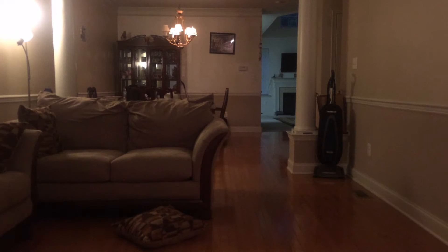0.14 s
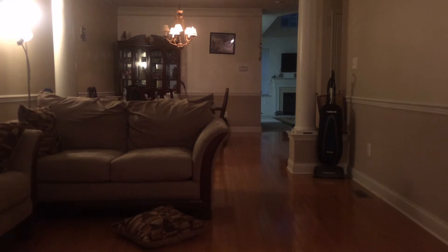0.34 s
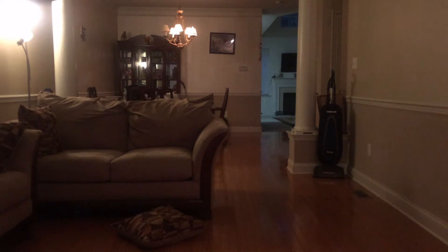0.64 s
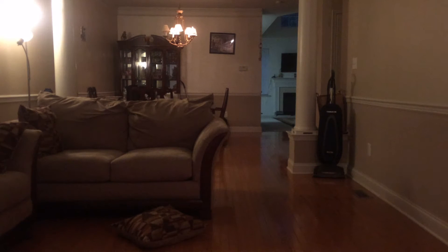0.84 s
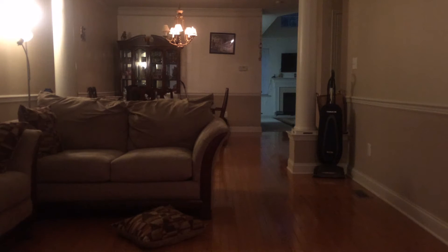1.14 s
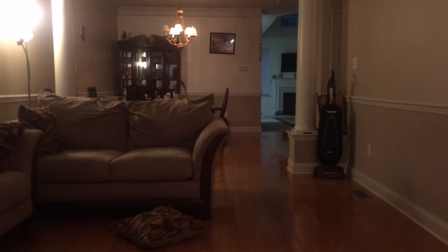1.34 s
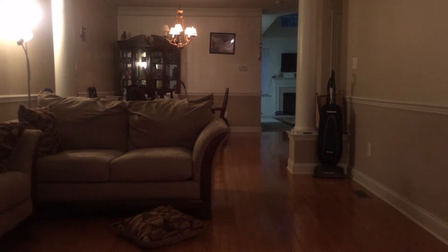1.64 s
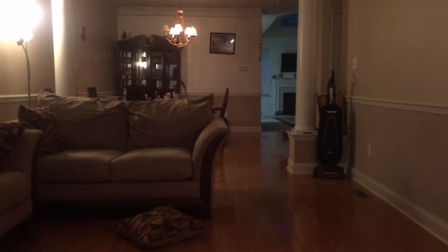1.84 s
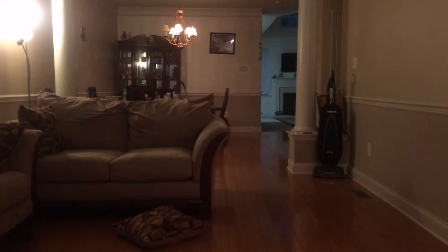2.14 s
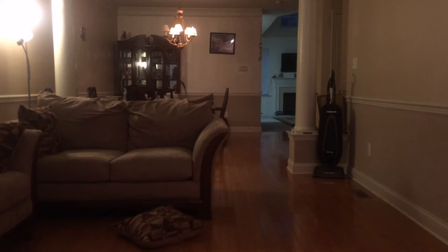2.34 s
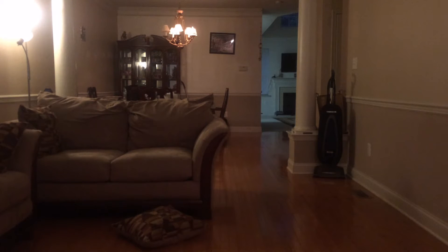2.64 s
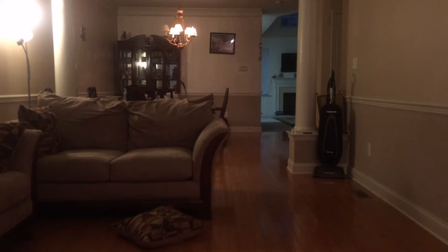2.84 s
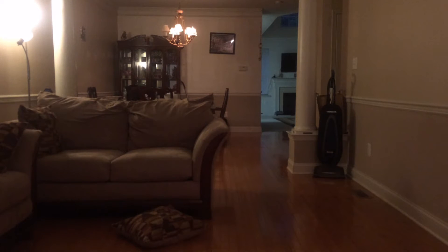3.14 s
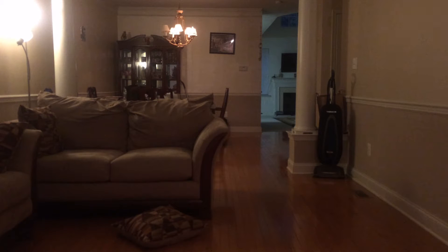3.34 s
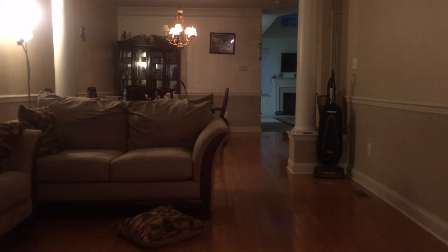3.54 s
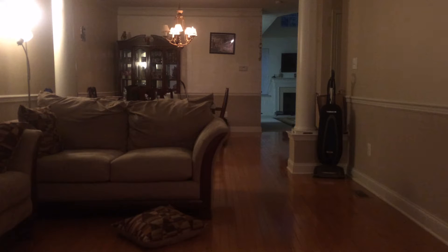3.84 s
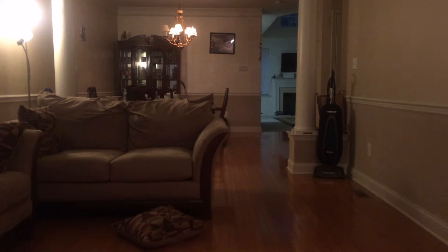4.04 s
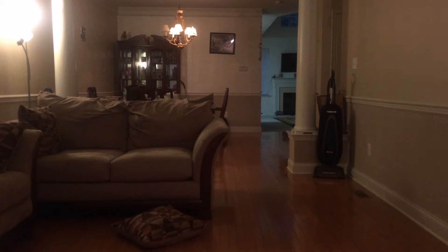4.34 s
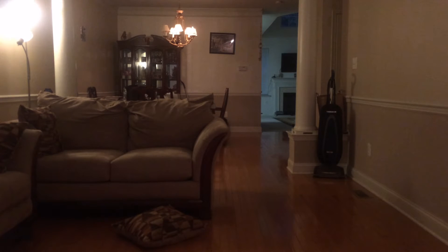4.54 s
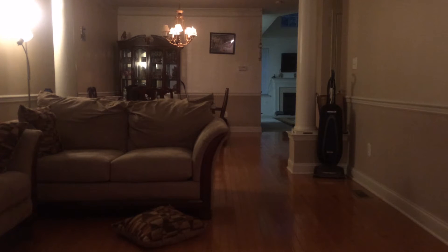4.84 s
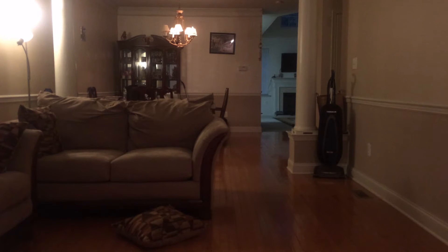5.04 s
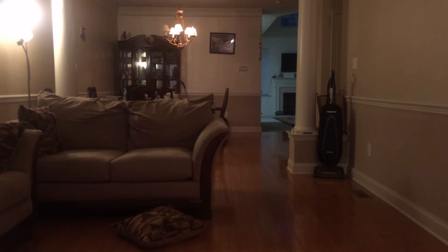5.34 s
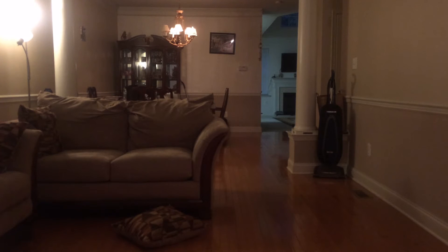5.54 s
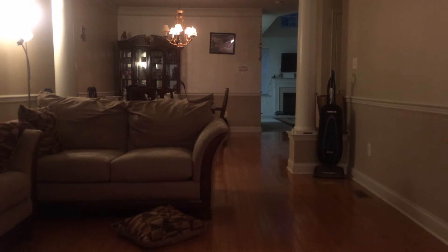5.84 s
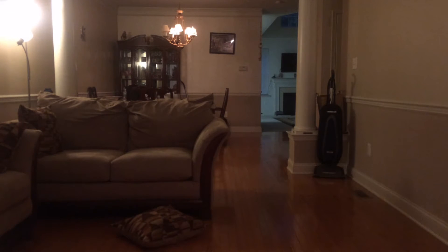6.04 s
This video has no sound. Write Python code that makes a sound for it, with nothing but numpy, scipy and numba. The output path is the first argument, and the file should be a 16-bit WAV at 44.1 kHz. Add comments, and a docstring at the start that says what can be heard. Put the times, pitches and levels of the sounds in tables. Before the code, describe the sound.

Five loud snapping shots from a toy dart blaster alternate with quick two-part plastic slide clacks, close up in a lightly echoing living room.

```python
"""A spring-powered toy dart blaster is pumped and fired repeatedly in a living room with a wooden floor.
Shots: sear snap, plunger slam and rebound, spring shudder, low air thump. Slide: stick-slip noise, bouncing clacks.
Every blow is a noise burst plus panel modes; resonators for the hollow plastic shell colour all but the thump.
Echoes and a decaying tail make the room; ventilation drones faintly; a limiter rounds the loudest peaks."""
import sys
import numpy as np
from scipy import signal
from scipy.fft import rfft, irfft
from scipy.io import wavfile
from numba import njit

SR = 44100
rng = np.random.default_rng(int(sys.argv[2]) if len(sys.argv) > 2 else 0)


def waveform_to_disk(signal):
    """Save audio, clipped to [-1, 1], as 16-bit WAV at the path in sys.argv[1]."""
    frames = np.transpose(np.atleast_2d(signal))
    scaled = np.clip(frames, -1, 1) * 32767
    samples = np.round(scaled).astype(np.int16)
    wavfile.write(sys.argv[1], SR, samples)


N = 272979

# ventilation drone spectrum, relative: hz, density_db_per_hz
HOUSE_SPECTRUM = [(22, -18.5), (54, -10.5), (105, -4), (135, -3), (167, -1.5), (205, -11), (320, -11),
                  (450, -13.5), (1700, -15), (3000, -28.5), (15000, -39.5)]
# room reverberation: hz, t60_s
ROOM_DECAY = [(80, 0.12), (210, 0.35), (560, 0.56), (1470, 0.59), (3880, 0.65), (7000, 0.53), (10200, 0.41),
              (15000, 0.34)]
# plastic shell resonances, relative to the direct blow: hz, width_hz, level_db
SHELL_MODES = [(554.3, 13, 0.5), (639, 66, -7.5), (973, 9.1, -15.5), (1168, 19, -6), (1370, 55, -18.5),
               (1570, 114.6, -7), (2050, 120, -15.5), (3024, 35, -18), (5620, 930, -18), (8890, 57, -33)]
# knocks of trigger, grip and landing darts: start_s, level_db, treble_over_body_db
SMALL_KNOCKS = [(.8455, -34.5, -13), (.907, -29, -13), (1.605, -25, -20.5), (1.650, -14.5, -1),
                (2.086, -25, -25), (2.765, -10.5, 2), (2.780, -14, -13), (3.125, -24, -12),
                (3.165, -27.5, -29), (4.1605, -14.5, -5), (4.185, -13.5, -8), (5.5805, -14, -2),
                (5.996, -27.5, -18)]
# slide pulled back: pickup_s, pickup_db, slack_s, unseat_db, squeeze_s, latch_db
SLIDE_PULLS = [(.9605, 6, 0.025, -8, .0253, 4), (2.1307, 3.5, 0.021, -8, 0.028, 4),
               (3.4888, 1, 0.018, -10, 0.045, 3), (4.7565, 5.5, 0.031, -21.5, .030, 1.5),
               (6.168, 4.5, 0.03, -15, .030, 6.5)]
# slide pushed forward: slam_s, slam_db, treble_over_body_db, stroke_s, meet_early_s, meet_db
SLIDE_PUSHES = [(1.2795, 10.5, 8.5, 0.061, 0.0095, 1.5), (2.463, 6.5, 3.5, .0795, 0.022, 1.5),
                (3.855, 9.5, 9, .0755, .0112, 5.5), (5.1574, 8, 3.5, 0.088, 0.021, 3)]
# spectrum of slide, trigger and sear sounds, relative: hz, level_db
SLIDE_SPECTRUM = [(60, -26), (170, -20.5), (380, -6.5), (560, -4), (800, -3.5), (1150, -1.5), (1600, -2.5),
                  (2200, -6), (3000, -7.5), (4000, -6), (8700, -7.5), (14500, -14), (17000, -35.5)]
# shots: release_s, snap_db, travel_s, slam_db, slam_treble_over_body_db, thump_db
SHOT_EVENTS = [(.0055, 1, 0.0085, 14, 9, 1.5), (1.6706, 7, 0.0059, 15, 5, 4),
               (2.8119, 7.5, 0.0075, 14, 0.5, 8), (4.214, 3.5, .007, 14.5, 5, 2.5),
               (5.605, 1.5, 0.0076, 15, 5, 6)]
# plunger slam spectrum, relative: hz, level_db
SLAM_SPECTRUM = [(35, -27), (90, -1), (200, -4), (300, 5), (430, -3), (620, -1.5), (950, -4), (1550, -5.5),
                 (2200, -11), (3600, -13), (6500, -14.5), (13000, -21.5), (16000, -33)]
# low ring set off by the puff of air, relative: hz, t60_s, level_db
THUMP_MODES = [(57, 0.17, -19), (103.5, 0.18, -0.5), (138, 0.044, -15), (160.2, 0.23, -2),
               (230, 0.32, -6.5), (310, 0.57, -8)]

HOUSE_DB = -56
TOP_HZ = 15300
# pull: unseat, pick up spring, latch plunger, hit back stop
UNSEAT_TREBLE_DB, PICKUP_TREBLE_DB, LATCH_TREBLE_DB = -6, 2.5, 8.5
STOP_AFTER_LATCH_S, STOP_OVER_LATCH_DB, STOP_TREBLE_DB = 0.0175, 1.73, 4
# push: leave back stop, meet breech with a flat face, slam home
LEAVE_DB, LEAVE_TREBLE_DB, MEET_DULLER_DB = -6.5, -1, 5
# bounces: mean first gap, shrink per gap, log-normal gap scatter, loss per bounce
BOUNCE_GAP_S, BOUNCE_SHRINK, BOUNCE_SCATTER = 0.009, 0.85, 0.1
BOUNCE_LOSS_DB, STOP_BOUNCE_LOSS_DB, MEET_BOUNCE_LOSS_DB = 6.5, 4, 3
# rail rubbing: start_db, end_db; grows as the spring is squeezed, eases going forward
PULL_RUB_DB, PUSH_RUB_DB = (-34, -21.5), (-27, -35.5)
RUB_LEAD_S = 0.0076  # creep before the first click


def undb(db):
    """Decibels to gain."""
    return 10 ** (np.asarray(db) / 20)


def unit(x):
    """Scale to unit energy."""
    return x / np.sqrt(np.sum(x ** 2))


def fade(t_s, t60_s):
    """Exponential decay, 60 dB down after t60_s."""
    return np.exp(-np.log(1000) * t_s / t60_s)


def add(track, start_s, sound):
    """Mix a sound into the track at start_s."""
    i = max(int(start_s * SR), 0)
    track[i:i + len(sound)] += sound[:max(N - i, 0)]


def split(x, split_hz):
    """Second-order low-pass and high-pass halves: body, treble."""
    low = signal.butter(2, split_hz, fs=SR, output="sos")
    high = signal.butter(2, split_hz, "high", fs=SR, output="sos")
    return signal.sosfilt(low, x), signal.sosfilt(high, x)


def on_log_axis(hz, points):
    """Interpolate (hz, value) points along log frequency."""
    point_hz, value = np.transpose(points)
    return np.interp(np.log(np.maximum(hz, 1)), np.log(point_hz), value)


def convolve(x, response):
    """Pass a track through an impulse response."""
    return signal.fftconvolve(x, response)[:N]


def colour(points, size=4096):
    """Minimum-phase impulse response of unit energy, by folding the cepstrum of the given spectrum."""
    gain = undb(on_log_axis(np.fft.rfftfreq(size, 1 / SR), points))
    cepstrum = irfft(np.log(gain))
    cepstrum[1:size // 2] *= 2
    cepstrum[size // 2 + 1:] = 0
    return unit(irfft(np.exp(rfft(cepstrum))))


def linger(power, t60_s):
    """Energy that is stored and leaks away, 60 dB down after t60_s."""
    keep = fade(1 / SR, t60_s) ** 2
    return signal.lfilter([1 - keep], [1, -keep], power)


def house():
    """Ventilation: steady noise shaped to a mostly low spectrum."""
    return undb(HOUSE_DB) * convolve(rng.standard_normal(N), colour(HOUSE_SPECTRUM))


def room(x, tail_db, early_db, early_t60_s=0.21, hall_db=-15, hall_stretch=2.11, first_echo_s=0.002,
         build_t60_s=0.012, modal_hz=1500, echoes_per_s=900):
    """Direct sound, sparse echoes off floor and furniture, then a tail that lingers in the adjoining hall."""
    t_s = np.arange(SR) / SR
    echoes = (rng.random(SR) < echoes_per_s / SR) * rng.standard_normal(SR) * (t_s > first_echo_s)
    response = undb(early_db) * unit(echoes * fade(t_s, early_t60_s))
    diffuse = 0
    edges_hz = np.r_[np.geomspace(70, 6000, 9), 8500, 11500, 17000]
    for low_hz, high_hz in zip(edges_hz, edges_hz[1:]):
        band = signal.butter(3, [low_hz, high_hz], "bandpass", fs=SR, output="sos")
        hz = np.sqrt(low_hz * high_hz)
        t60_s = on_log_axis(hz, ROOM_DECAY)
        # low bands mostly repeat one fixed response; high bands mostly ring as fresh noise
        modal = 1 / (1 + (hz / modal_hz) ** 2)
        decay = unit(fade(t_s, t60_s) * (1 - fade(t_s, build_t60_s)))
        ringing = decay * signal.sosfilt(band, rng.standard_normal(SR))
        response = response + undb(tail_db) * np.sqrt(modal) * ringing
        power = linger(signal.sosfilt(band, x + 1e-9) ** 2 + 1e-18, build_t60_s)
        room_power = (1 - modal) * linger(power, t60_s)
        hall_power = undb(hall_db) ** 2 * linger(power, hall_stretch * t60_s)
        noise = unit(signal.sosfilt(band, rng.standard_normal(N)))
        diffuse = diffuse + noise * np.sqrt(N * (room_power + hall_power))
    return x + convolve(x, response) + undb(tail_db) * diffuse


def shell(x, level_db=-1):
    """Hollow body: parallel resonators add short rings to whatever strikes it."""
    rings = 0
    for hz, width_hz, ring_db in SHELL_MODES:
        b, a = signal.iirpeak(hz, hz / width_hz, fs=SR)
        rings = rings + undb(ring_db) * signal.lfilter(b, a, x)
    return undb(level_db) * (x + rings)


def burst(t60_s, size=8192, rise_s=0.00081):
    """One blow: decaying noise chatter, its spectrum flattened and its envelope reapplied twice."""
    t_s = np.arange(size) / SR
    chatter = rng.standard_normal(size) * fade(t_s, t60_s)
    envelope = fade(t_s, 10 * t60_s) * (1 - np.exp(-t_s / rise_s))
    for _ in range(2):
        spectrum = rfft(chatter, 2 * size)
        chatter = irfft(spectrum / (np.abs(spectrum) + 1e-12))[:size] * envelope
    return unit(chatter)


def contact(treble_db, t60_s, split_hz, panel_db=-9, panel_t60_s=0.052,
            panel_low_hz=500, panel_high_hz=3500, count=3):
    """Plastic on plastic: a hard corner favours treble, a flat face body; random panel modes ring."""
    blow = burst(t60_s)
    t_s = np.arange(len(blow)) / SR
    hz = panel_low_hz * (panel_high_hz / panel_low_hz) ** rng.random((count, 1))
    modes = np.sum(np.sqrt(hz) * np.sin(2 * np.pi * hz * t_s), axis=0)
    panels = unit(modes * fade(t_s, panel_t60_s))
    blow = unit(blow + undb(panel_db) * panels)
    body, treble = split(blow, split_hz)
    return body * undb(-treble_db / 2) - treble * undb(treble_db / 2)


def knocks(table, t60_s, split_hz):
    """A track of plastic contacts, one per row."""
    out = np.zeros(N)
    for start_s, level_db, treble_db in table:
        add(out, start_s, undb(level_db) * contact(treble_db, t60_s, split_hz))
    return out


def bouncing(start_s, level_db, treble_db, loss_db, count=3):
    """A blow and its weakening bounces; rows: start_s, level_db, treble_over_body_db."""
    scatter = np.exp(BOUNCE_SCATTER * rng.standard_normal(count))
    gaps_s = BOUNCE_GAP_S * BOUNCE_SHRINK ** np.arange(count) * scatter
    return [(start_s + gaps_s[:k].sum(), level_db - k * loss_db, treble_db) for k in range(count)]


def slide_blows():
    """Every pull and push strikes its catches and stops in a set order; rows as for bouncing."""
    blows = []
    for pickup_s, pickup_db, slack_s, unseat_db, squeeze_s, latch_db in SLIDE_PULLS:
        latch_s = pickup_s + squeeze_s
        blows += [(pickup_s - slack_s, unseat_db, UNSEAT_TREBLE_DB)]
        blows += bouncing(pickup_s, pickup_db, PICKUP_TREBLE_DB, BOUNCE_LOSS_DB)
        blows += [(latch_s, latch_db, LATCH_TREBLE_DB)]
        blows += bouncing(latch_s + STOP_AFTER_LATCH_S, latch_db + STOP_OVER_LATCH_DB,
                          STOP_TREBLE_DB, STOP_BOUNCE_LOSS_DB)
    for slam_s, slam_db, treble_db, stroke_s, meet_early_s, meet_db in SLIDE_PUSHES:
        blows += [(slam_s - stroke_s, LEAVE_DB, LEAVE_TREBLE_DB)]
        blows += bouncing(slam_s - meet_early_s, meet_db, treble_db - MEET_DULLER_DB, MEET_BOUNCE_LOSS_DB)
        blows += bouncing(slam_s, slam_db, treble_db, BOUNCE_LOSS_DB)
    return blows


def slide_travel():
    """The slide rubs until it reaches a stop; rows: start_s, end_s, start_db, end_db."""
    travel = []
    for pickup_s, _, slack_s, _, squeeze_s, _ in SLIDE_PULLS:
        end_s = pickup_s + squeeze_s + STOP_AFTER_LATCH_S
        travel.append((pickup_s - slack_s - RUB_LEAD_S, end_s, *PULL_RUB_DB))
    for slam_s, _, _, stroke_s, _, _ in SLIDE_PUSHES:
        travel.append((slam_s - stroke_s - RUB_LEAD_S, slam_s, *PUSH_RUB_DB))
    return travel


def scrapes(grit=0.74, slips_per_s=160, slip_t60_s=0.046, rub=0.82, rise_s=0.0078):
    """Stick-slip on the rails: gritty noise scaled by steady rub plus random decaying slips."""
    out = np.zeros(N)
    hiss, sizes = rng.standard_normal((2, N))
    slip_starts = 1. * (rng.random(N) < slips_per_s / SR)
    slips = convolve(slip_starts, fade(np.arange(SR) / SR, slip_t60_s))
    friction = hiss * np.exp(grit * sizes) * (rub + slips)
    for start_s, end_s, start_db, end_db in slide_travel():
        piece = friction[int(start_s * SR):int(end_s * SR)]
        n = len(piece)
        rise = 1 - np.exp(-np.arange(n) / SR / rise_s)
        pressure = undb(np.linspace(start_db, end_db, n)) * rise
        add(out, start_s, unit(piece) * np.sqrt(n) * pressure)
    return out


def air_thump(puff_s=0.0033):
    """Puff of air: decaying low sines of alternating sign with a soft onset."""
    t_s = np.arange(SR // 2) / SR
    ring = 0
    for k, (hz, t60_s, level_db) in enumerate(THUMP_MODES):
        ring = ring + undb(level_db) * np.sin(2 * np.pi * hz * t_s) * fade(t_s, t60_s) * (-1) ** k
    return unit(ring * (1 - np.exp(-t_s / puff_s)))


def shots(snap_t60_s=0.1, snap_treble_db=5, slam_t60_s=0.023, rebound_s=0.008, rebound_db=-2,
          spring_db=-10, spring_t60_s=0.058):
    """The sear lets go, the plunger slams home and rebounds, the spring shudders and air thumps out."""
    snaps, slams, thumps = np.zeros((3, N))
    thump = air_thump()
    for release_s, snap_db, travel_s, slam_db, treble_db, thump_db in SHOT_EVENTS:
        slam_s = release_s + travel_s
        snap = contact(snap_treble_db, snap_t60_s, split_hz=3500)
        slam = contact(treble_db, slam_t60_s, split_hz=1200, panel_db=-8, count=6)
        rebound = contact(treble_db, slam_t60_s, split_hz=1580, panel_db=-9.5, count=6)
        add(snaps, release_s, undb(snap_db) * snap)
        add(slams, slam_s, undb(slam_db) * slam)
        add(slams, slam_s + rebound_s, undb(slam_db + rebound_db) * rebound)
        add(slams, slam_s + rebound_s, undb(slam_db + spring_db) * burst(spring_t60_s))
        add(thumps, release_s, undb(thump_db) * thump)
    return snaps, slams, thumps


def scene():
    """Slide, trigger and plunger through room and shell, plus dry thumps and house drone."""
    clacks = knocks(slide_blows(), t60_s=0.027, split_hz=1950)
    ticks = knocks(SMALL_KNOCKS, t60_s=0.33, split_hz=4200)
    snaps, slams, thumps = shots()
    slide_in_room = room(clacks + ticks + snaps + scrapes(), tail_db=-0.5, early_db=-6.5)
    slide = convolve(slide_in_room, colour(SLIDE_SPECTRUM))
    plunger = convolve(room(slams, tail_db=-5.5, early_db=-10.5), colour(SLAM_SPECTRUM))
    return (shell(slide + plunger) + thumps + house())[None]


@njit
def follow(x, attack, release):
    """Peak envelope; attack and release are per-sample smoothing fractions."""
    out, e = np.empty(len(x)), 0.
    for i in range(len(x)):
        e += (abs(x[i]) - e) * (attack if abs(x[i]) > e else release)
        out[i] = e
    return out


def record(dry, limit_db=-5, attack_s=0.00011, release_s=0.02, low_cut_hz=45):
    """Microphone bass loss, limiter, soft rounding of peaks, top cut."""
    low_cut = signal.butter(2, low_cut_hz, "high", fs=SR, output="sos")
    heard = signal.sosfilt(low_cut, dry)
    attack = 1 - np.exp(-1 / (attack_s * SR))
    release = 1 - np.exp(-1 / (release_s * SR))
    envelope = follow(heard[0], attack, release)
    limited = heard / np.maximum(envelope / undb(limit_db), 1)
    rounded = 0.7 * np.tanh(limited / 0.7)
    top_cut = signal.ellip(10, 0.2, 70, TOP_HZ, fs=SR, output="sos")
    return signal.sosfilt(top_cut, rounded)


dry = scene()
out = record(dry)
waveform_to_disk(out)
```